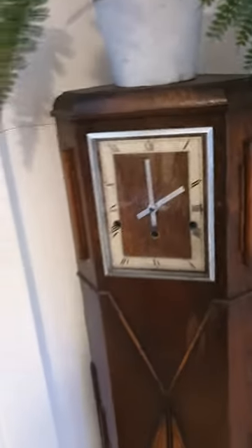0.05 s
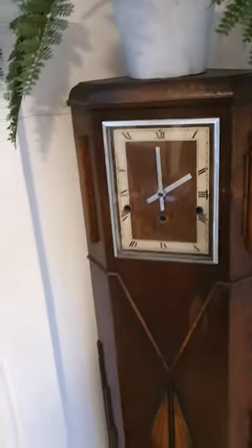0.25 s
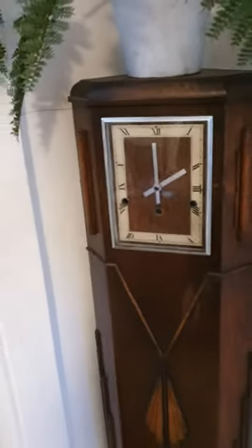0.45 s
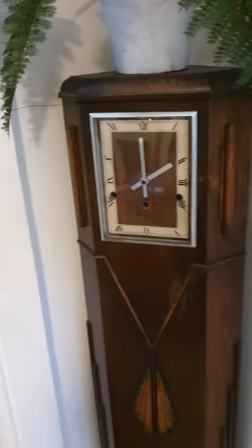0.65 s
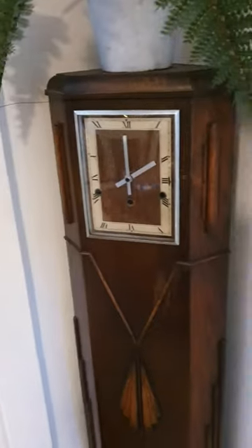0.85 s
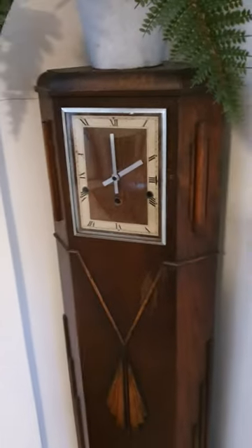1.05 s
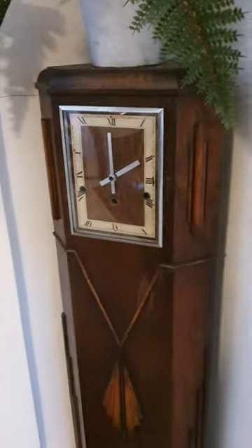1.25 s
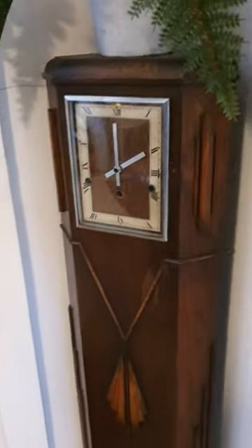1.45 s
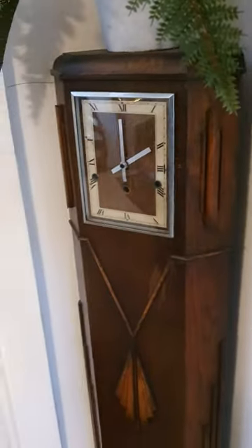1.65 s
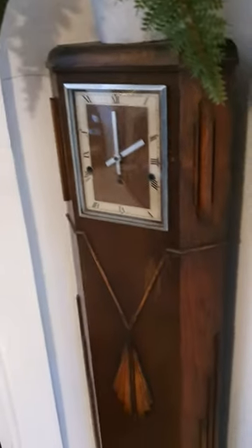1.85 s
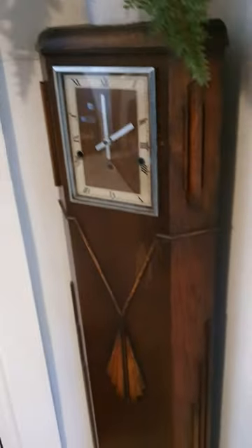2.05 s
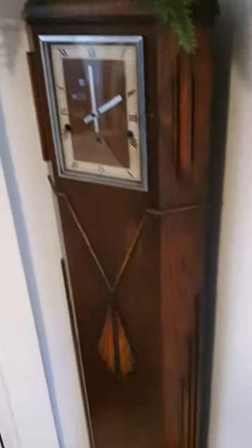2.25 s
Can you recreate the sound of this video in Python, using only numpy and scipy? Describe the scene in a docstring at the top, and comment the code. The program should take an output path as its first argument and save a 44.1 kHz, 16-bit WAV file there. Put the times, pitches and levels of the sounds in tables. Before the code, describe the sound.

Close microphone handling noise: a finger makes several fast muffled thumps, mostly on the right. The grip shifts with a soft rub, the camera casing creaks and gives two clicks, and faint bumps follow over a quiet room's hiss.

```python
"""A fingertip catches and slips right beside a camera's right microphone port: a quick run of dull thumps.
The hand shifts its grip and rubs, then the casing gives two double clicks, carried straight to both
microphones and faintly answered by the walls. The place is a quiet room, heard on the hand-held camera's
own stereo pair: a low handling rumble close up, a soft hiss and two faint distant taps behind it."""
import sys
import numpy as np
from scipy import signal
from scipy.fft import rfft, irfft, next_fast_len
from scipy.io import wavfile

SR = 44100
rng = np.random.default_rng(int(sys.argv[2]) if len(sys.argv) > 2 else 0)


def wrap_up_sound(samples):
    """Save the sound to the file named by the first command line argument, as 16-bit audio."""
    columns = np.atleast_2d(samples).T
    # keep every value between -1 and 1, then stretch to whole-number steps
    tamed = np.clip(columns, -1, 1)
    steps = np.round(tamed * 32767).astype(np.int16)
    wavfile.write(sys.argv[1], SR, steps)


N = 101429


def amp(db):
    """Decibels to gain."""
    return 10 ** (np.asarray(db) / 20)


def along(points, hz):
    """(f/Hz, value) points read on a log frequency axis."""
    f, values = np.transpose(points)
    return np.interp(np.log(hz + 1), np.log(f + 1), values)


def level(rows):
    """(t/s, level/dB) points as one gain per sample."""
    s, db = np.transpose(rows)
    return amp(np.interp(np.arange(N) / SR, s, db))


def since(s):
    """Seconds since s, zero before it."""
    return np.maximum(np.arange(N) / SR - s, 0)


def swells(rows, rise_s, t60_s):
    """A gain that rises quickly and fades for each (t/s, level/dB) row."""
    return sum(amp(db - 60 * since(s) / t60_s) * (1 - np.exp(-since(s) / rise_s)) for s, db in rows)


def filtered(x, response):
    """x through a complex frequency response."""
    size = next_fast_len(N + SR // 2)
    return irfft(rfft(x, size) * response(np.fft.rfftfreq(size, 1 / SR)), size)[..., :N]


def noise(colour, balance=((1000, 0),), likeness=((1000, 0),)):
    """Stereo noise of rms 1; by default centred, with left and right unrelated."""
    def mid_side_gains(hz):
        angle = np.arccos(np.clip(along(likeness, hz), -1, 1)) / 2
        return amp(along(colour, hz)) * [np.cos(angle), np.sin(angle)]
    mid, side = filtered(rng.standard_normal((2, N)), mid_side_gains)
    pair = np.array([mid + side, mid - side])
    pair = filtered(pair, lambda hz: amp(np.outer([.5, -.5], along(balance, hz))))
    return pair / np.sqrt(np.mean(pair ** 2))


def pulse(s, colour, limit_hz, pitch=1, size=16384):
    """One sharp impact at time s with the given colour, shifted in pitch and dulled above the limit."""
    hz = np.fft.rfftfreq(size, 1 / SR)
    gain = amp(along(colour, hz / pitch)) / np.sqrt(1 + (hz / limit_hz) ** 4)
    cepstrum = irfft(np.log(gain + 1e-6))
    cepstrum[1:size // 2] *= 2  # minimum phase: nothing sounds before the impact
    cepstrum[size // 2 + 1:] = 0
    impact = irfft(np.exp(rfft(cepstrum)))
    return np.pad(impact, (round(s * SR), N))[:N]


def thump(s, start_hz, end_hz=67.5, fall_s=.0054, rise_s=.0045, life_s=.019):
    """The microphone's answer to a push: a few cycles that fall in pitch."""
    t = since(s - .00068)  # the push starts just before the skin lets go
    cycles = end_hz * t + (start_hz - end_hz) * fall_s * (1 - np.exp(-t / fall_s))
    envelope = (1 - np.exp(-t / rise_s)) * np.exp(-(t / life_s) ** 2)
    return -envelope * np.sin(2 * np.pi * cycles)


# Room tone, a little to the left
AIR_COLOUR = [(180, -9), (300, -8.5), (397, -14.5), (492, -9.5), (631, -17), (1240, -15.5), (1370, -17),
              (2650, -15.5), (6050, -31.5), (15500, -21)]  # f/Hz, density/dB
ROOM_BALANCE = [(500, 3.5), (10000, 0)]  # f/Hz, left minus right/dB
# Taps far from the camera
TAPS = [(0.014, -65.5), (2.042, -70.5)]  # t/s, level/dB
TAP_COLOUR = [(300, -34), (700, -3.5), (1200, -2), (1800, -33.5), (5000, -27), (12000, -46)]  # f/Hz, density/dB
def room(air_db=-81):
    """Still air all round, and distant taps blurred by the walls."""
    air = amp(air_db) * noise(AIR_COLOUR, ROOM_BALANCE)
    taps = swells(TAPS, rise_s=.017, t60_s=.2) * noise(TAP_COLOUR, ROOM_BALANCE)
    return air + taps


# Background hiss, stronger in the right microphone
HISS_LEVEL = [(0, -67), (.18, -71), (.3, -64), (.42, -65.5), (.53, -75), (.65, -80.5), (.9, -80),
              (1.13, -70.5), (1.22, -81.5), (1.3, -77), (1.52, -81.5), (1.75, -85.5), (2.0, -86),
              (2.3, -81.5)]  # t/s, level/dB
HISS_COLOUR = [(300, 4), (600, 3), (1100, 1.5), (1700, -3.5), (2800, -4.5), (4000, 0.5), (6700, -4.5),
               (7600, -15.5), (12000, -13), (16000, -29)]  # f/Hz, density/dB
HISS_BALANCE = [(500, -5.5), (4000, -5.5), (10000, -5)]  # f/Hz, left minus right/dB
def hiss():
    """A soft hiss comes and goes."""
    return level(HISS_LEVEL) * noise(HISS_COLOUR, HISS_BALANCE)


# Decay of the room around the camera
ROOM_T60 = [(200, 0.55), (1000, 0.29), (4000, .35), (12000, .25)]  # f/Hz, time to fall 60 dB/s
def wall_echo(click, low_cut_hz=450):
    """The walls return a click to both microphones; the small casing radiates no deep bass."""
    hz, t, spectra = signal.stft(rng.standard_normal((2, SR // 2)), SR, nperseg=256)
    decay = amp(-60 * t / along(ROOM_T60, hz)[:, None])
    tail = signal.istft(spectra * decay, SR, nperseg=256)[1]
    wet = signal.fftconvolve(click[None], tail / np.linalg.norm(tail[0]), axes=1)[:, :N]
    return filtered(wet, lambda f: (1j * f / (low_cut_hz + 1j * f)) ** 2)


# Handling rumble and soft bumps on the camera body, mostly in the right microphone
RUMBLE_LEVEL = [(0, -65), (.12, -61), (.18, -56), (.3, -54.5), (.42, -48), (.48, -56), (.56, -55),
                (.65, -60), (.76, -65), (.81, -53), (.87, -59), (.97, -53.5), (1.05, -47), (1.14, -44),
                (1.19, -72.5), (1.25, -75), (1.33, -60.5), (1.44, -62.5), (1.5, -56), (1.6, -68),
                (1.68, -72), (1.72, -59), (1.83, -61.5), (1.95, -60.5), (2.0, -75), (2.1, -61), (2.16, -64),
                (2.3, -65.5)]  # t/s, level/dB
RUMBLE_COLOUR = [(13, 1), (22, -45), (39, -0.5), (70, 2), (91, 0), (187, -14.5), (250, -16.5), (360, -23),
                 (623, -45), (700, -29), (910, -58), (1540, -120)]  # f/Hz, density/dB
RUMBLE_BALANCE = [(60, -15.5), (200, -15.5), (500, -4)]  # f/Hz, left minus right/dB
BUMPS = [(.108, -45), (0.528, -43.5), (0.664, -56), (.715, -50), (.8, -47), (1.467, -45.5), (1.727, -42),
         (1.795, -43), (1.835, -46.5), (2.091, -53)]  # t/s, level/dB
def hand_rumble(bump_left_db=-20):
    """The holding hand rumbles and bumps against the camera."""
    rumble = level(RUMBLE_LEVEL) * noise(RUMBLE_COLOUR, RUMBLE_BALANCE)
    bumps = sum(amp(db) * thump(s, start_hz=170) for s, db in BUMPS)
    return rumble + np.array([amp(bump_left_db) * bumps, bumps])


# Skin on the casing, close up and right of centre: a dull rub and faint bright brushes
RUB_LEVEL = [(0, -95), (.5, -84), (.62, -87), (.71, -73.5), (.77, -82), (.83, -72.5), (.875, -85),
             (.89, -58.5), (.925, -59.5), (.96, -67), (.99, -70), (1.03, -108), (1.065, -57.5), (1.14, -63),
             (1.28, -89), (1.42, -86), (1.51, -74.5), (1.62, -92), (1.69, -88), (1.73, -78), (1.82, -86.5),
             (1.91, -79), (2.0, -85.5), (2.1, -79.5), (2.3, -103)]  # t/s, level/dB
RUB_COLOUR = [(100, -5), (190, 5.5), (300, 2), (550, -3), (900, -11), (1400, -26), (2200, -20.5),
              (4500, -27.5), (12000, -47)]  # f/Hz, density/dB
RUB_LIKENESS = [(500, 0.09), (1200, 0.22), (3000, -0.015)]  # f/Hz, left-right correlation
SKIN_BALANCE = [(300, -5.5), (3000, -2.5)]  # f/Hz, left minus right/dB
BRUSHES = [(.903, -72.5), (1.287, -83.5), (1.49, -80.5)]  # t/s, level/dB
BRUSH_COLOUR = [(1000, -23), (2400, -12), (3150, -1.5), (4200, -13), (7000, -24.5), (12000, -34.5)]  # f/Hz, density/dB
def hand_rub():
    """The hand slides over the camera, rubbing hardest just before the clicks."""
    rub = level(RUB_LEVEL) * noise(RUB_COLOUR, SKIN_BALANCE, RUB_LIKENESS)
    brushes = swells(BRUSHES, rise_s=.0021, t60_s=.4) * noise(BRUSH_COLOUR, SKIN_BALANCE)
    return rub + brushes


# The casing's response at the near, right microphone, and its small creaks before the clicks
CASING_COLOUR = [(30, -27), (70, 9.5), (120, 12), (190, 18.5), (320, 8.5), (690, 10), (1080, 10), (1380, 3),
                 (1720, -7.5), (2500, -5.5), (3350, -25), (5200, -23.5), (7800, -28), (11500, -23.5),
                 (16000, -36)]  # f/Hz, level/dB
CREAKS = [(0.884, -36, 500), (0.918, -30.5, 350), (1.017, -18, 220), (1.035, -21, 220), (1.048, -18, 300),
          (1.053, -18.5, 400), (1.059, -9.5, 444)]  # t/s, level/dB, treble limit/Hz
# Double clicks: t/s, level/dB, pitch factor, treble limit/Hz,
# gap to rebound/s, rebound level/dB, rebound treble limit/Hz, thump level/dB
CLICKS = [(1.0751, 1, 0.92, 6960, 0.00448, -0.5, 812, -16),
          (1.1144, -.5, 1.002, 6000, 0.0057, -0.5, 1223, -20.5)]
def casing(rock_lag_s=.0059, lag_hz=1440, far_db=-3, far_hz=820, far_q=1.3, treble_share=.41):
    """The casing creaks and clicks under the grip, shaking the two microphones in opposite directions."""
    near = sum(amp(db) * pulse(s, CASING_COLOUR, limit_hz) for s, db, limit_hz in CREAKS)
    for s, db, pitch, limit_hz, gap_s, rebound_db, rebound_hz, thump_db in CLICKS:
        near += amp(db) * pulse(s, CASING_COLOUR, limit_hz, pitch)
        near += amp(rebound_db) * pulse(s + gap_s, CASING_COLOUR, rebound_hz, pitch)
        near += amp(thump_db) * thump(s + gap_s + rock_lag_s, start_hz=80)  # camera rocks in the hand
    # The casing passes the treble first, the lows a little later.
    near = filtered(near, lambda hz: (lag_hz - 1j * hz) / (lag_hz + 1j * hz))
    dulled = filtered(near, lambda hz: 1 / (1 + 1j * hz / far_hz / far_q - (hz / far_hz) ** 2))
    far = treble_share * near + (1 - treble_share) * dulled
    return np.array([-amp(far_db) * far, near])


# Slips at the edge of the right microphone port:
# t/s, thump level/dB, starting f/Hz, snap level/dB, snap treble limit/Hz, scrape level/dB
SLIPS = [(0.2221, -8.5, 211, -9.5, 900, -45.5), (0.2984, -14, 195, -3, 710, -57.5),
         (0.3405, -20, 208, -2, 1980, -61), (0.3663, -20.5, 205, -1.5, 1800, -60),
         (0.3995, -20, 215, -2.5, 2180, -57), (0.41, -60, 201, -12, 900, -91),
         (.426, -21, 210, -4.5, 2040, -57)]
# Skin letting go, then scraping on
SNAP_COLOUR = [(60, -1.5), (200, 10.5), (450, 2), (900, -2.5), (1500, -12.5), (3000, -24.5), (8000, -31),
               (16000, -60)]  # f/Hz, level/dB
SCRAPE_COLOUR = [(300, -4), (900, 4), (2000, -2.5), (4000, -4.5), (6500, -15), (8000, -21.5), (12000, -21),
                 (16000, -35)]  # f/Hz, density/dB
def fingertip(left_leak_db=-38, scrape_peak_s=.0061):
    """Each slip pushes air into the right port: a falling thump, a small snap and a brief scrape."""
    port = np.zeros(N)
    skin = noise(SCRAPE_COLOUR)[1]
    for s, thump_db, start_hz, snap_db, limit_hz, scrape_db in SLIPS:
        port += amp(thump_db) * thump(s, start_hz)
        port -= amp(snap_db) * pulse(s, SNAP_COLOUR, limit_hz)
        age = since(s) / scrape_peak_s
        port += amp(scrape_db) * age * np.exp(1 - age) * skin
    return np.array([amp(left_leak_db) * port, port])


def scene(echo_db=-30):
    """The quiet room behind, the handling right at the microphones."""
    slips = fingertip()
    clicks = casing()
    echo = amp(echo_db) * wall_echo(clicks[1])
    hand = hand_rumble() + hand_rub()
    return room() + hiss() + echo + hand + clicks + slips


def record(dry, top_hz=16050):
    """The camera keeps nothing above its band limit."""
    return filtered(dry, lambda hz: hz < top_hz)


dry = scene()
out = record(dry)
wrap_up_sound(out)
```